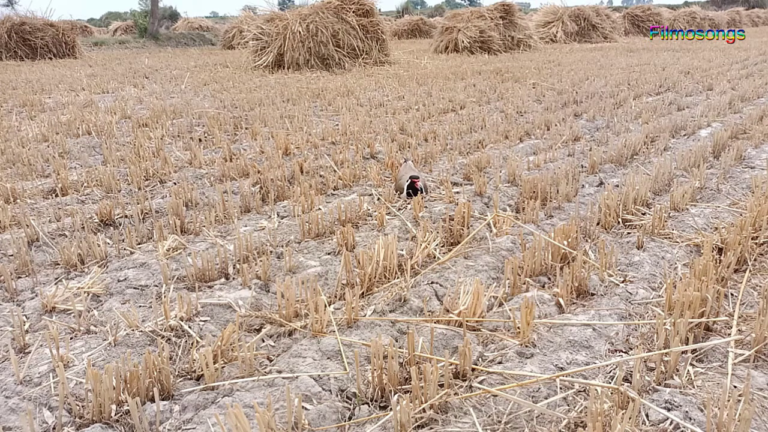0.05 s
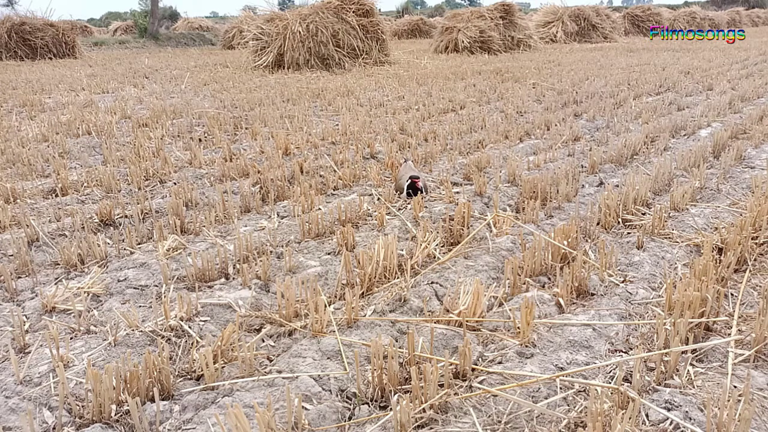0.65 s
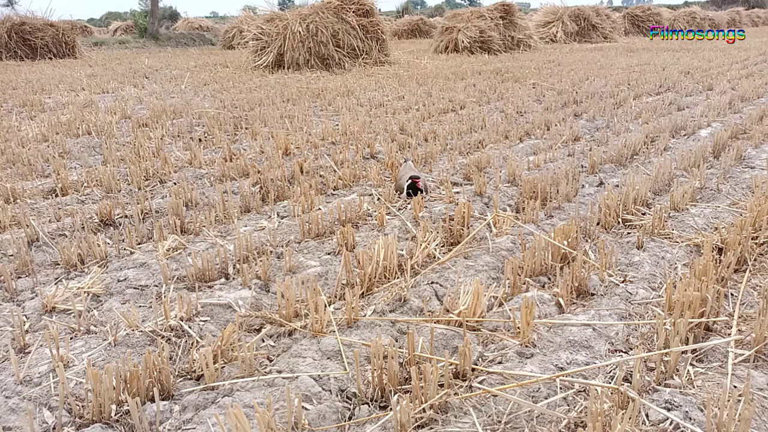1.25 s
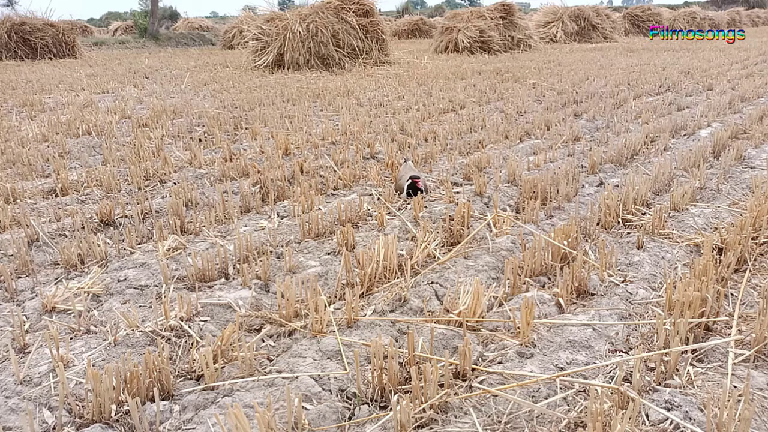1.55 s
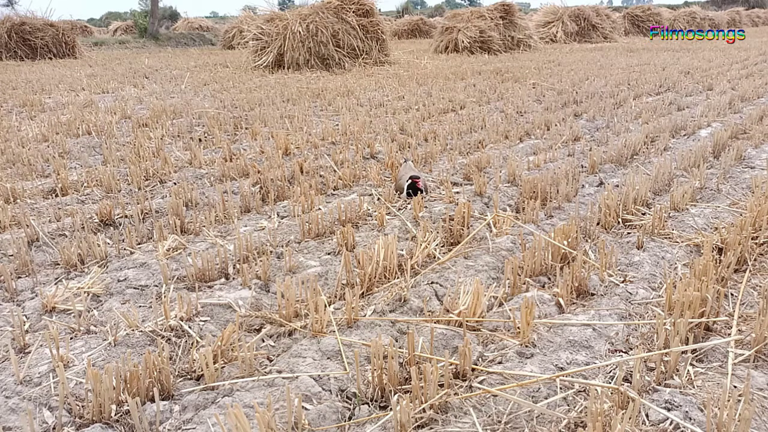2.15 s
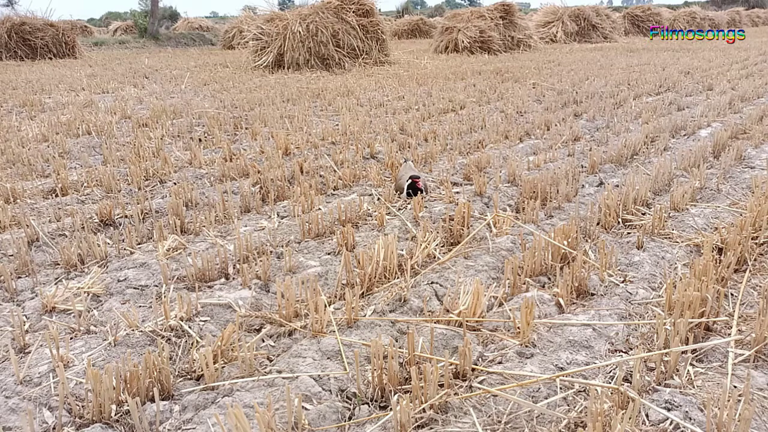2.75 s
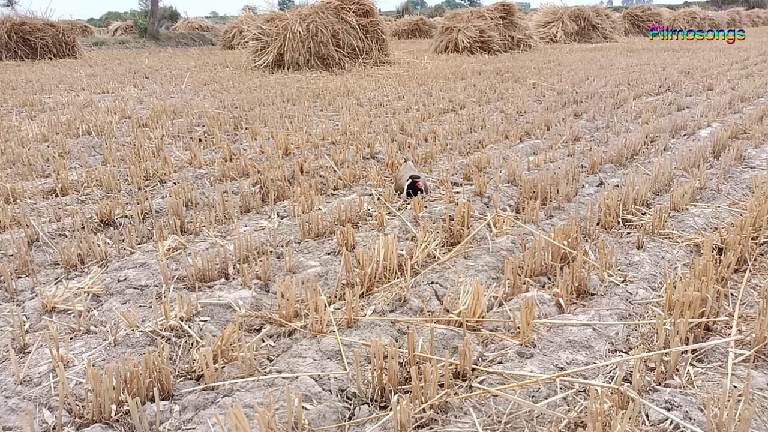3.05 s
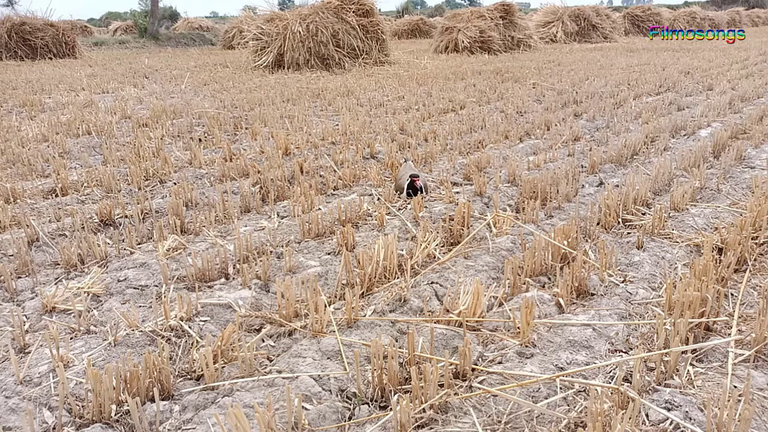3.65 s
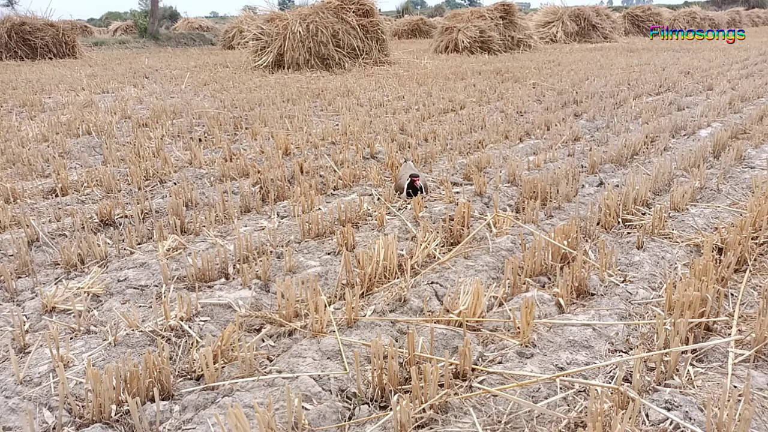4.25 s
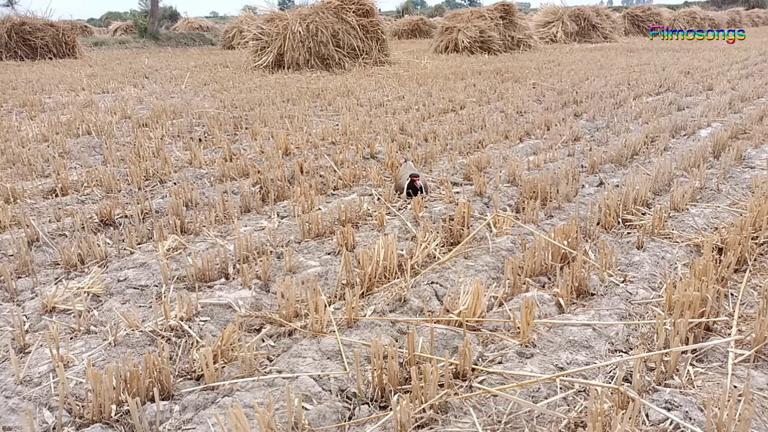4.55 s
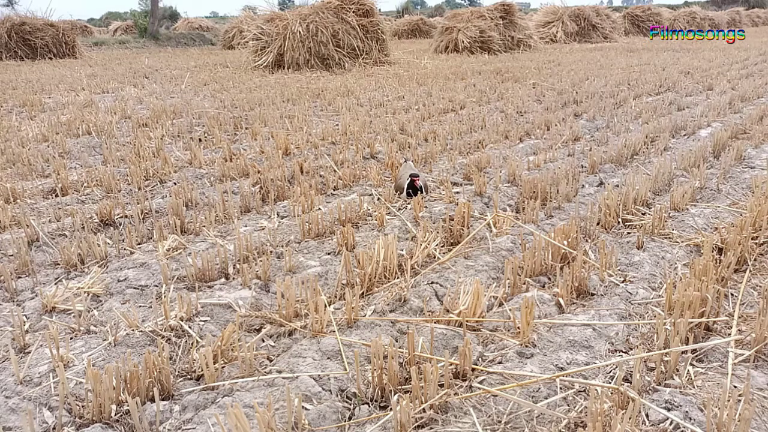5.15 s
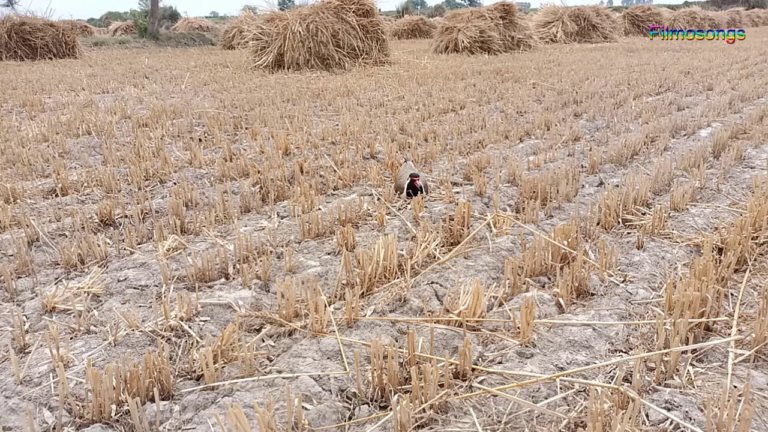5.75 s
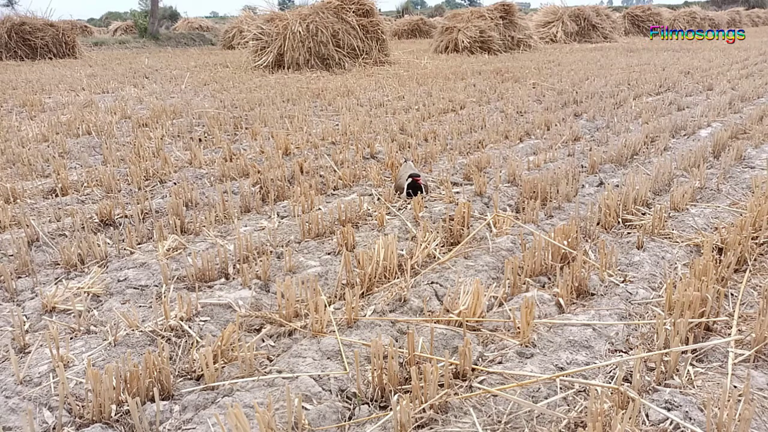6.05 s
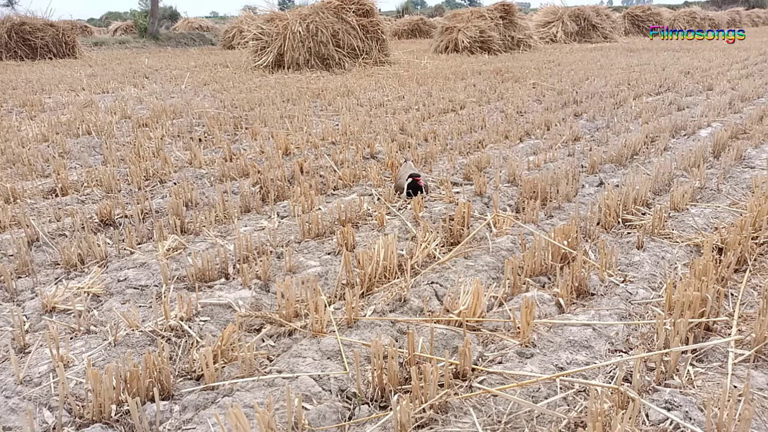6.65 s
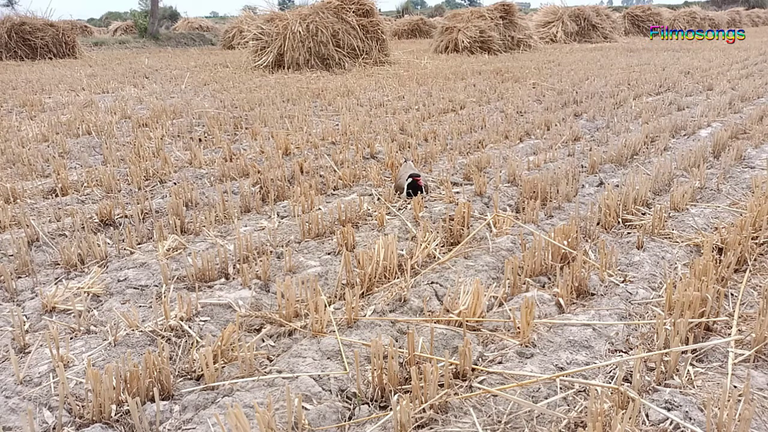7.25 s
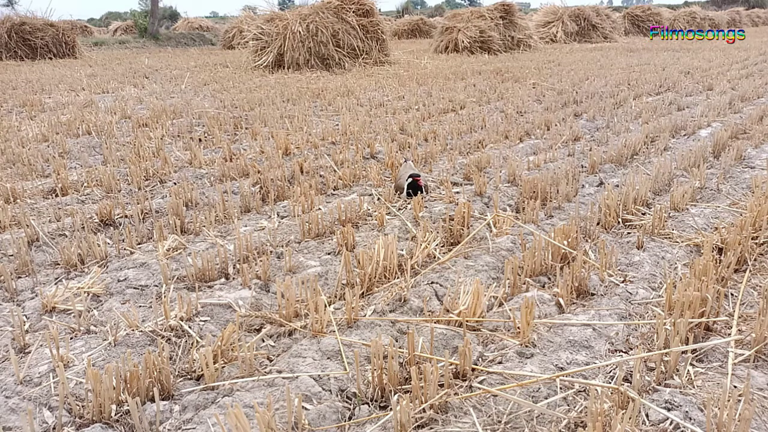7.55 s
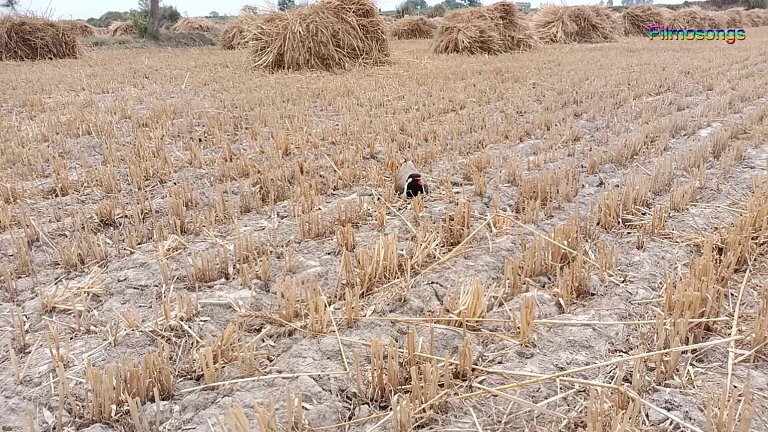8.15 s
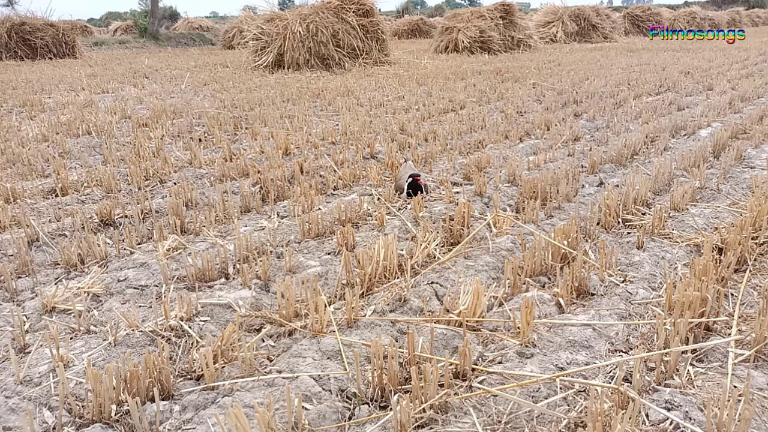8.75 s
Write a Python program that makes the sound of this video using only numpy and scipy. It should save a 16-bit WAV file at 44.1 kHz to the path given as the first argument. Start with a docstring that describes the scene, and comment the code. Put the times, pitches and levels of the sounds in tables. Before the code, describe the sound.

Shrill, trilling lapwing screeches, near and far, cut through soft songbird chirps, air hiss and distant rumble in an open field.

```python
"""Stubble field over a low rumble and soft air hiss. A far lapwing calls first, then on and off; small
birds whistle and chirp throughout. Near 2 s a close lapwing scolds twice: harmonics swept through
throat resonances, shaken by a fast trill, rasping with escaping air. The far one answers; a faint hum
swells and fades. From 5.5 s a songbird sings a run of upslurs; dry straw ticks near 7 s.
After 8 s the close lapwing screeches twice more."""
import sys
import numpy as np
from scipy import signal
from scipy.fft import rfft, irfft, next_fast_len
from scipy.io import wavfile
from scipy.ndimage import uniform_filter1d, map_coordinates

SR = 44100
rng = np.random.default_rng(int(sys.argv[2]) if len(sys.argv) > 2 else 0)


def pcm_store(signal):
    """Save signal as 16-bit PCM."""
    levels = np.round(np.clip(np.atleast_2d(signal), -1, 1) * 32767)
    wavfile.write(sys.argv[1], SR, levels.astype(np.int16).T)


N = 392049
BAND_LIMIT_HZ = 15100

RUMBLE_DB, AIR_DB, AIR_SWELL_SHARE = -48, -56.5, 0.54
HUM_MID_S, HUM_LENGTH_S, HUM_DB = 2.5, 1.9, -65
# rumble swell, used about its mean: t/s, level/dB
RUMBLE_SWELL = [(0, -46.5), (.3, -48), (1.05, -47), (1.45, -50), (2.1, -44), (2.6, -48), (3.1, -50.5),
                (3.9, -52.5), (4.8, -52.5), (5.4, -48.5), (5.7, -52.5), (6.15, -45.5), (6.5, -51.5),
                (7.3, -48.5), (8.05, -52), (8.5, -46), (8.89, -51)]
# noise spectra: f/Hz, relative density/dB
RUMBLE_SPECTRUM = [(15, -9), (25, -6), (33, -7), (42, 2), (50, 3.5), (62, 4), (70, -12.5), (80, -9),
                   (95, -15), (130, -27.5), (220, -29.5), (500, -80)]
AIR_SPECTRUM = [(59, -32), (100, -6), (149, -6), (188, -10.5), (222, -11), (286, -9.5), (768, -13),
                (836, -14.5), (1440, -9.5), (2290, -12), (2770, -17), (4680, -19.5), (6700, -27),
                (10800, -30.5), (12600, -27.5), (15200, -42)]
HUM_SPECTRUM = [(110, -29), (148, -4), (175, -2.5), (220, -24), (600, -62.5)]
STRAW_SPECTRUM = [(500, -27), (2000, -12), (5000, 6), (8500, 1), (11000, -7), (15000, -37)]
RASP_SPECTRUM = [(120, -9), (300, -7), (800, -7.5), (1700, 16.5), (2600, 1.5), (3200, 7.5), (4000, 0),
                 (4900, 5), (6000, -2), (7200, -2), (8600, -22), (10000, -19.5), (11000, -43),
                 (12500, -13.5), (14000, -50.5)]
# background stereo image: f/Hz, left-right correlation
COHERENCE = [(28, 0.46), (50, 1), (130, 0.58), (290, 0.1), (630, 0.16), (1390, -0.00095), (3060, -0.074),
             (6720, 0.018), (14800, -0.061)]
# scatter from stubble and stacks: f/Hz, T60/s
FIELD_DECAY = [(300, 0.97), (2000, 0.23), (10000, 0.037)]
# straw ticks: t/s, initial level/dB
STRAW_TICKS = [(1.1094, -56), (6.806, -53), (6.8836, -45.5), (6.9354, -52)]

WHISTLE_HZ = 3140
# steady whistles: t/s, length/s, level/dB
WHISTLES = [(0.273, 0.083, -63), (0.84, 0.14, -59.5), (1.618, 0.24, -61.5)]
# falling slurs: t/s, length/s, start f/Hz, end f/Hz, hoarseness, level/dB, L-R/dB
FALLING_SLURS = [(0.34, 0.079, 2680, 2110, 0.3, -60.5, 3), (0.851, 0.058, 4780, 3570, 0.3, -63.5, -7),
                 (0.949, 0.037, 3000, 2080, 0.32, -51, 5), (1.686, .059, 3100, 1930, 0.6, -53.5, 6),
                 (6.818, 0.16, 3050, 2770, 0.29, -63.5, 7), (6.927, 0.054, 2750, 2030, 0.55, -56, 4)]
# three-note phrases: t/s, level/dB
PHRASE_STARTS = [(1.208, -47.5), (1.597, -49.5)]
# rise, drop to a held tone, high fall: delay/s, length/s, (start, mid, end) f/Hz, gain/dB, L-R/dB
PHRASE_NOTES = [(0, 0.036, (2600, 2800, 3600), -15, 3), (.1, 0.0808, (2730, 2350, 2390), 0, 1.5),
                (0.113, .055, (4750, 4000, 3200), -12.5, -6)]
ARCH_DELAY_S, CHIRP_S = 0.097, 0.078
# two-part chirps: t/s, arch f/Hz, hoarse note level/dB, arch level/dB, arch L-R/dB
CHIRP_PAIRS = [(.466, 4220, -58.5, -53, 3.5), (2.226, 4530, -57.5, -60.5, 0), (3.359, 4560, -61.5, -62, 1),
               (4.222, 4430, -65, -58.5, -1.5), (7.381, 4360, -63, -63, 2)]
# lone hoarse chips: t/s, length/s, f/Hz, level/dB, L-R/dB
LONE_CHIPS = [(0.657, 0.071, 5230, -58.5, -3.5), (1.288, 0.061, 5280, -58, -3.5),
              (1.853, 0.024, 4970, -59.5, 3.5), (3.818, .048, 4860, -71, 0), (4.837, 0.041, 5250, -67, -3),
              (5.36, 0.0314, 5430, -67, 4.5), (5.71, .078, 3960, -64, -4),
              (7.881, 0.045, 3710, -61.5, -5.5)]
PIP_LEAD_S, PIP_S, PIP_HZ = 0.046, 0.028, 4270
FLICK_GAP_S, FLICK_S, FLICK_HZ = 0.005, 0.027, (6500, 6080, 6100)
# upslurs: t/s, length/s, mid f/Hz, rise/oct, hoarseness, level/dB, pip level/dB, flick level/dB
SONG_SYLLABLES = [(5.523, 0.071, 5570, 0.23, 0.5, -69, -90, -65),
                  (5.711, 0.07, 5600, .25, 0.9, -71, -90, -62),
                  (5.909, 0.065, 5680, 0.31, 0.52, -75, -90, -66),
                  (6.085, 0.075, 5050, 0.11, 0.17, -53, -90, -74),
                  (6.263, 0.065, 4970, 0.14, 0.6, -52.5, -90, -61),
                  (6.482, 0.033, 4400, 0.14, 0, -60, -90, -65.5),
                  (6.653, 0.043, 4380, 0.17, 0.14, -55, -56, -62.5),
                  (6.833, 0.047, 4340, 0.2, 0.12, -54.5, -61, -62),
                  (7.018, .056, 4310, 0.25, 0.15, -55.5, -59.5, -63),
                  (7.216, .072, 4460, 0.42, 0.15, -53.5, -62, -65.5),
                  (7.417, 0.04, 4520, .44, 0, -55.5, -71, -70), (7.6, .042, 4540, .45, .08, -57, -92, -70)]

ATTACK_S, FADE_DB_PER_S, RELEASE_S, SCOOP_S = 0.04, 9.5, 0.059, 0.09
BILL_HZ, BILL_WIDTH_HZ = 3884, 230
# lapwing throat response: f/Hz, gain/dB
THROAT_RESPONSE = [(450, -31), (600, -7.5), (900, -16.5), (1100, -16), (1380, -9), (1520, -12.5), (1660, 2),
                   (1780, 1.5), (1950, 0.5), (2100, -16), (2380, -20), (2750, -31), (3200, -38.5),
                   (3950, -34), (4250, -37), (4800, -50), (5350, -50), (6000, -52), (6800, -43.5),
                   (8600, -48.5), (11000, -63.5)]
# narrow throat peaks and dips: f/Hz, width/Hz, gain/dB
THROAT_MODES = [(4419, 200, -1.5), (4860, 370, -17), (5370, 130, 4.5), (6630, 98, 9), (7340, 110, 1.5),
                (8520, 58, 8.5)]
# trill over one call: t/s, rate/Hz, dip depth, roughness
TRILL_COURSE = [(0, 78, 0.6, 0.65), (.06, 76, 0.9, 0.33), (.15, 82, 0.7, 0.36), (.23, 65, 0.5, 0.56),
                (.32, 77, 0.37, .75)]
# far calls: t/s, length/s, level/dB, 4th harmonic top f/Hz, sag/(Hz/s), end droop fraction, rasp/dB
FAR_CALLS = [(-.08, 0.3, -38, 1811, 887, 0.3, -15.5), (0.408, 0.34, -59, 1800, 350, 0.17, 6.5),
             (2.12, 0.28, -34.5, 1831, 588, 0.18, -13.5), (2.581, 0.41, -35, 1764, 453, 0.23, -8),
             (3.679, 0.16, -59, 1813, 900, 0.24, 0), (5.188, 0.3, -44.5, 1855, 551, .18, -14),
             (5.986, .278, -42.5, 1843, 1102, .22, -30), (7.062, 0.18, -49, 1833, 200, 0.36, -6)]
# near calls: t/s, length/s, level/dB, 4th harmonic top f/Hz, scoop fraction, sag/(Hz/s),
# bill ring/dB, treble/dB
NEAR_CALLS = [(1.89, 0.35, -19.5, 1895, .09, 934, 11.5, -2), (2.62, 0.35, -20.5, 1855, 0.07, 819, 12, -2),
              (8.13, 0.37, -20.6, 1901, .055, 541, -2, -2.5), (8.746, .35, -22, 1856, .02, 488, -16, -0.5)]
# microphone shading towards the near bird: f/Hz, L-R/dB
NEAR_SHADING = [(800, 0.5), (1300, 8), (1800, 4), (2500, -3), (3500, 3.5), (5000, -2.5), (7200, 5),
                (8200, 12.5), (9700, 24.5), (12500, 5.5)]
SIDES = np.array([[0.5], [-0.5]])  # left and right share of an L-R difference


def amp(db):
    """Decibels to gain."""
    return 10 ** (np.asarray(db) / 20)


def unit_rms(x):
    """Scale to rms 1."""
    return x / np.sqrt(np.mean(x ** 2) + 1e-20)


def at_hz(points, hz):
    """Interpolate (f/Hz, value) points on a log axis."""
    knots_hz, values = np.transpose(points)
    return np.interp(np.log(hz + 1), np.log(knots_hz + 1), values)


def at_time(rows, t):
    """Interpolate each value column of (t/s, ...) rows."""
    knots_s, *columns = np.transpose(rows)
    return [np.interp(t, knots_s, column) for column in columns]


def wobble(rate_hz, size):
    """Smooth random curve, rate_hz knots a second."""
    knots = rng.standard_normal(size // 8 + 8)
    return map_coordinates(knots, [np.arange(size) * rate_hz / SR], mode="wrap")


def filtered(x, response):
    """FFT filter with gain response(hz)."""
    size = x.shape[-1]
    n_fft = next_fast_len(size + 8192)
    return irfft(rfft(x, n_fft) * response(np.fft.rfftfreq(n_fft, 1 / SR)), n_fft)[..., :size]


def equalise(x, points):
    """Filter by (f/Hz, gain/dB) points."""
    return filtered(x, lambda hz: amp(at_hz(points, hz)))


def noise(spectrum, size):
    """Coloured noise, rms 1."""
    return unit_rms(equalise(rng.standard_normal(size), spectrum))


def add(track, start_s, x):
    """Mix x into track at start_s."""
    start = round(start_s * SR)
    x = x[..., max(-start, 0):]
    part = track[..., max(start, 0):][..., :x.shape[-1]]
    part += x[..., :part.shape[-1]]


def place(x, shading, lag_ms):
    """Point source at two microphones: shading is (f/Hz, L-R/dB), left lags by lag_ms."""
    def response(hz):
        return amp(SIDES * at_hz(shading, hz)) * np.exp(-2j * np.pi * hz * SIDES * lag_ms / 1000)
    return filtered(x, response)


def stereo_noise(spectrum, patch_db):
    """Noise of rms 1 with random time-frequency gain patches, nearly mono in the bass."""
    def mid_side_gain(hz):
        angle = np.arccos(np.clip(at_hz(COHERENCE, hz), -1, 1)) / 2
        return amp(at_hz(spectrum, hz)) * np.array([np.cos(angle), np.sin(angle)])
    bins = signal.stft(rng.standard_normal((2, N)), nperseg=512)[2]
    patches = uniform_filter1d(rng.standard_normal(bins.shape[1:]), size=6, axis=0)
    patches = unit_rms(uniform_filter1d(patches, size=14, axis=1))
    pair = signal.istft(bins * amp(patch_db * patches), nperseg=512)[1][:, :N]
    mid, side = filtered(pair, mid_side_gain)
    return unit_rms(np.array([mid + side, mid - side]))


def rumble_and_air():
    """Distant rumble swelling slowly; open-air hiss follows it in part."""
    contour_db, = at_time(RUMBLE_SWELL, np.arange(N) / SR)
    swell_db = contour_db - contour_db.mean()
    rumble = stereo_noise(RUMBLE_SPECTRUM, patch_db=0.5)
    power = uniform_filter1d(np.mean(rumble ** 2, axis=0), size=SR // 6)
    rumble /= np.sqrt(np.abs(power) + 1e-6)  # flatten the noise's own swings
    air_db = AIR_DB + AIR_SWELL_SHARE * swell_db + 0.5 * wobble(8.4, N)
    rumble_db = RUMBLE_DB + swell_db + 0.37 * wobble(7, N)
    return amp(rumble_db) * rumble + amp(air_db) * stereo_noise(AIR_SPECTRUM, patch_db=2.09)


def hum():
    """Narrow band of low noise; swells and fades once."""
    position = np.clip((np.arange(N) / SR - HUM_MID_S) / HUM_LENGTH_S, -0.5, 0.5)
    return amp(HUM_DB) * np.cos(np.pi * position) * stereo_noise(HUM_SPECTRUM, patch_db=7.5)


def field_scatter(x):
    """Diffuse tail of the field; treble dies first."""
    hz, t, bins = signal.stft(rng.standard_normal((2, SR // 2)), SR, nperseg=256)
    decay = amp(-60 * t / at_hz(FIELD_DECAY, hz)[:, None])
    tail = signal.istft(bins * decay, SR, nperseg=256)[1]
    return signal.fftconvolve(x, tail / np.linalg.norm(tail[0]), axes=1)[:, :N]


def straw(t60_s=0.032):
    """Dry ticks: fast-decaying noise bursts."""
    track = np.zeros((2, N))
    t = np.arange(SR // 20) / SR
    for start_s, db in STRAW_TICKS:
        burst = np.array([noise(STRAW_SPECTRUM, len(t)) for _ in range(2)])
        add(track, start_s, amp(db - 60 * t / t60_s) * burst)
    return track


def note(length_s, pitches_hz, hoarse, db, balance_db):
    """Whistle gliding through three pitches; hoarseness is fast flutter of pitch and level."""
    size = int(length_s * SR)
    progress = np.linspace(0, 1, size)
    glide_hz = np.polyval(np.polyfit([0, 0.5, 1], pitches_hz, 2), progress)
    pitch_hz = glide_hz + (18 + hoarse * 430) * wobble(900, size)
    envelope = np.abs(np.sin(np.pi * progress)) ** 0.57 * amp((2.2 + 2 * hoarse) * wobble(160, size))
    tone = amp(db) * unit_rms(envelope * np.sin(2 * np.pi * np.cumsum(pitch_hz) / SR))
    return place(tone, [(3000, balance_db)], lag_ms=-0.012 * balance_db)  # louder side leads


def glide(hz, octaves):
    """Start, middle and end pitch of an even glide centred on hz."""
    return hz * 2 ** (octaves * np.array([-0.5, 0, 0.5]))


def whistlers():
    """Lower, fluting birds: steady whistles, falling slurs, a repeated phrase."""
    track = np.zeros((2, N))
    for start_s, length_s, db in WHISTLES:
        add(track, start_s, note(length_s, [WHISTLE_HZ] * 3, hoarse=0.02, db=db, balance_db=7))
    for start_s, length_s, start_hz, end_hz, hoarse, db, balance_db in FALLING_SLURS:
        add(track, start_s, note(length_s, np.linspace(start_hz, end_hz, 3), hoarse, db, balance_db))
    for start_s, db in PHRASE_STARTS:
        for delay_s, length_s, pitches_hz, gain_db, balance_db in PHRASE_NOTES:
            tone = note(length_s, pitches_hz, hoarse=0.07, db=db + gain_db, balance_db=balance_db)
            add(track, start_s + delay_s, tone)
    return track


def chirper():
    """Hoarse rising note, then an arched whistle with a weaker second voice above."""
    track = np.zeros((2, N))
    for start_s, hz, lead_db, arch_db, balance_db in CHIRP_PAIRS:
        arch_hz = hz * np.array([0.98, 1, 0.91])
        lead = note(CHIRP_S, glide(1.07 * hz, 0.0853), hoarse=0.8, db=lead_db, balance_db=-3)
        arch = note(CHIRP_S, arch_hz, hoarse=0.16, db=arch_db, balance_db=balance_db)
        upper = note(CHIRP_S, 1.21 * arch_hz, hoarse=0.096, db=arch_db - 10, balance_db=-5)
        add(track, start_s, lead)
        add(track, start_s + ARCH_DELAY_S, arch + upper)
    return track


def songbird():
    """Syllables of pip, upslur and high flick; the upslurs end clearer and steeper."""
    track = np.zeros((2, N))
    for start_s, length_s, hz, rise_oct, hoarse, db, pip_db, flick_db in SONG_SYLLABLES:
        pip = note(PIP_S, glide(PIP_HZ, -0.01), hoarse=0.087, db=pip_db, balance_db=1)
        upslur = note(length_s, glide(hz, rise_oct), hoarse, db, balance_db=-2.5)
        flick = note(FLICK_S, FLICK_HZ, hoarse=0.19, db=flick_db, balance_db=3)
        add(track, start_s - PIP_LEAD_S, pip)
        add(track, start_s, upslur)
        add(track, start_s + length_s + FLICK_GAP_S, flick)
    return track


def small_birds():
    """All small birds, plus lone hoarse chips."""
    track = songbird() + chirper() + whistlers()
    for start_s, length_s, hz, db, balance_db in LONE_CHIPS:
        add(track, start_s, note(length_s, glide(hz, 0.1), hoarse=0.7, db=db, balance_db=balance_db))
    return track


def screech(length_s, top_hz, sag_hz_per_s, scoop, sag_start_s, droop, droop_s,
            swing, jitter, shimmer_db, rasp_db):
    """Lapwing call: harmonics sweep the throat resonance; a fast trill shakes pitch and level."""
    size = int(length_s * SR)
    t = np.arange(size) / SR
    fourth_hz = top_hz * (1 - scoop * np.maximum(1 - t / SCOOP_S, 0))
    fourth_hz -= sag_hz_per_s * np.maximum(t - sag_start_s, 0)
    rate_hz, depth, rough = at_time(TRILL_COURSE, t)
    beats = np.cumsum(rate_hz * (1 + 0.066 * rough * wobble(40, size))) / SR
    arch = np.abs(np.sin(np.pi * beats))
    spent = np.exp((t - length_s) / droop_s)  # pressure runs out: pitch falls, trill dies
    fall, trill = 1 - droop * spent, (1 - spent) ** 2
    deviation = swing * (arch ** 1.6 - 0.68) + jitter * rough * wobble(700, size)
    pitch_hz = fourth_hz / 4 * fall * (1 + trill * deviation)
    phase = 2 * np.pi * np.cumsum(pitch_hz) / SR
    throat_scale = fall ** 0.82  # closing bill lowers the resonance
    voice = np.zeros(size)
    for k in range(2, 22):
        partial_db = at_hz(THROAT_RESPONSE, k * pitch_hz / throat_scale)
        partial_db += shimmer_db * rough * wobble(300, size)
        voice += amp(partial_db) * np.sin(k * phase + rng.uniform(0, 2 * np.pi))
    rasp = noise(RASP_SPECTRUM, size) * (1 + 0.36 * np.cos(phase))  # air escapes once a cycle
    dips = 1 - trill * depth * (1 - arch) ** 2.94
    strength = unit_rms(dips * amp(0.47 * wobble(122.3, size)))
    rasp = np.sqrt(np.abs(strength)) * amp(rasp_db) * unit_rms(rasp)
    gate = np.minimum(t / ATTACK_S, 1) * np.minimum((length_s - t) / RELEASE_S, 1)
    return gate * amp(-FADE_DB_PER_S * t) * (unit_rms(strength * voice) + rasp)


def far_lapwing():
    """Distant calls, treble lost on the way."""
    track = np.zeros(N)
    for start_s, length_s, db, top_hz, sag_hz_per_s, droop, rasp_db in FAR_CALLS:
        call = screech(length_s, top_hz, sag_hz_per_s, scoop=0, sag_start_s=0.06, droop=droop,
                       droop_s=0.024, swing=0.19, jitter=0.035, shimmer_db=1, rasp_db=rasp_db)
        add(track, start_s, amp(db) * call)
    track = equalise(track, [(900, -10.5), (1500, -1.5), (2200, -3), (4000, -9), (6000, -8)])
    return place(track, [(700, -1), (1800, 4.5), (4000, -6)], lag_ms=-0.066)


def bill_and_throat(x, bill_db):
    """Narrow peaks and dips; a wide-open bill adds a reedy ring."""
    def response(hz):
        gain = 1
        for centre_hz, width_hz, db in [(BILL_HZ, BILL_WIDTH_HZ, bill_db), *THROAT_MODES]:
            peak = 1j * hz * width_hz / (centre_hz ** 2 - hz ** 2 + 1j * hz * width_hz)
            gain = gain * (1 + (amp(db) - 1) * peak)
        return gain
    return filtered(x, response)


def stubble_echo(x, t60_s=0.078):
    """Stalks near the path reflect treble within 25 ms, differently to each microphone."""
    t = np.arange(SR // 40) / SR
    glances = rng.standard_normal((2, len(t))) * amp(-60 * t / t60_s)
    echo = signal.fftconvolve(x[None], glances / np.linalg.norm(glances[0]), axes=1)[:, :len(x)]
    tilt = [(2000, -25.5), (4500, 4.5)]
    return filtered(echo, lambda hz: amp(SIDES * at_hz(NEAR_SHADING, hz) + at_hz(tilt, hz)))


def near_lapwing():
    """Close calls, bright and raspy: direct path plus stubble echo."""
    track = np.zeros((2, N))
    for start_s, length_s, db, top_hz, scoop, sag_hz_per_s, bill_db, treble_db in NEAR_CALLS:
        call = screech(length_s, top_hz, sag_hz_per_s, scoop, sag_start_s=0.13, droop=0.37,
                       droop_s=0.018, swing=0.15, jitter=0.0322, shimmer_db=4, rasp_db=-21.5)
        call = np.pad(call, (0, SR // 40))  # room for the echo
        call = equalise(call, [(2500, 0.011), (5000, treble_db)])
        call = bill_and_throat(call, bill_db)
        add(track, start_s, amp(db) * (place(call, NEAR_SHADING, lag_ms=0.45) + stubble_echo(call)))
    return track


def scene():
    """Stereo mix; far sources carry more field scatter."""
    near, far, birds = near_lapwing(), far_lapwing(), small_birds()
    send = amp(-27) * near + amp(-13) * far + amp(-10) * birds
    return near + far + birds + straw() + field_scatter(send) + rumble_and_air() + hum()


def record(dry):
    """Brick-wall low-pass."""
    return filtered(dry, lambda hz: hz < BAND_LIMIT_HZ)


dry = scene()
out = record(dry)
pcm_store(out)
```